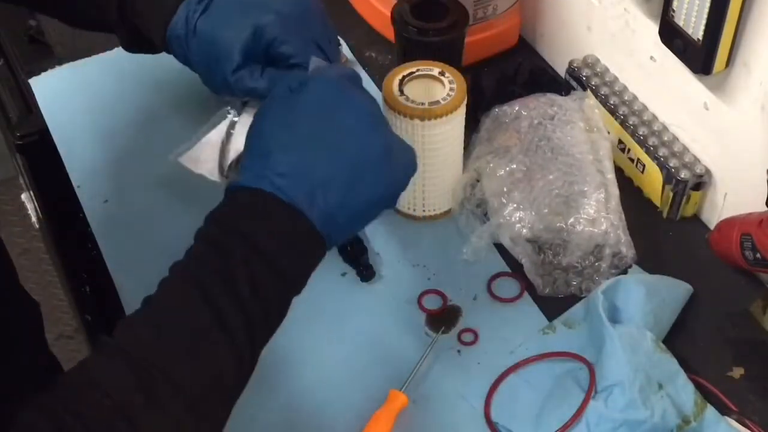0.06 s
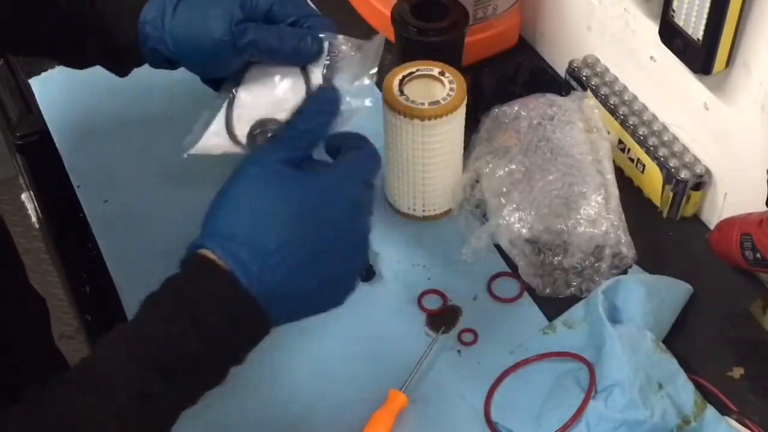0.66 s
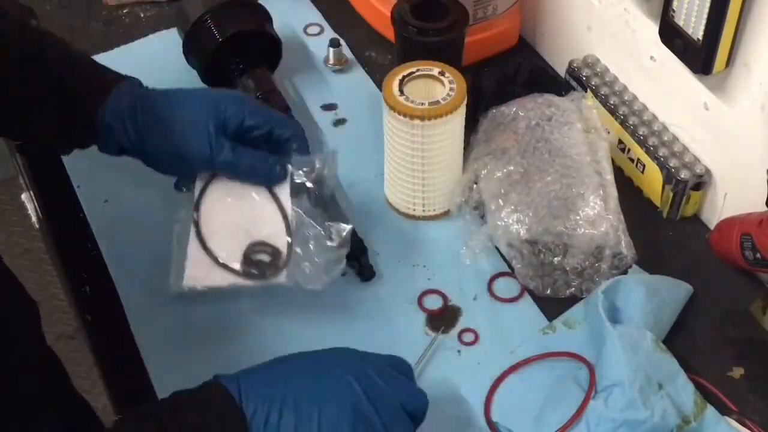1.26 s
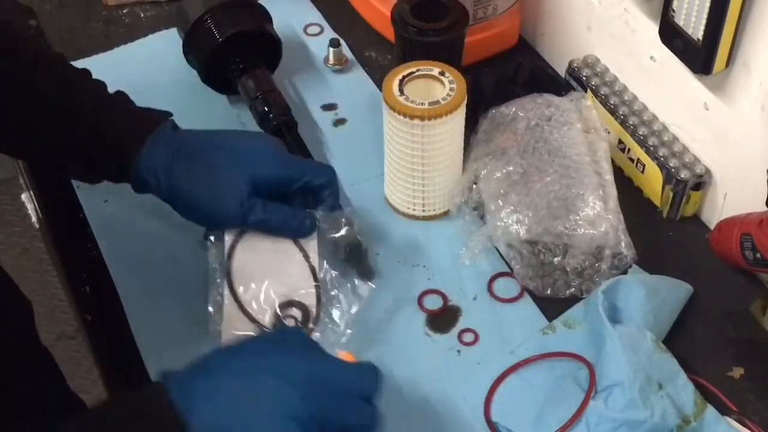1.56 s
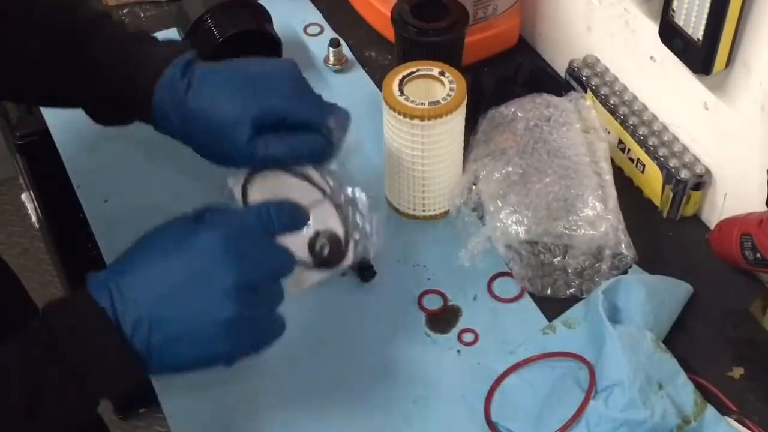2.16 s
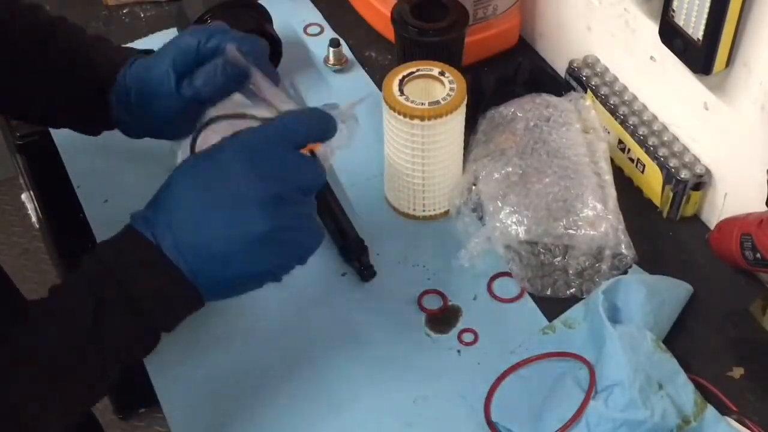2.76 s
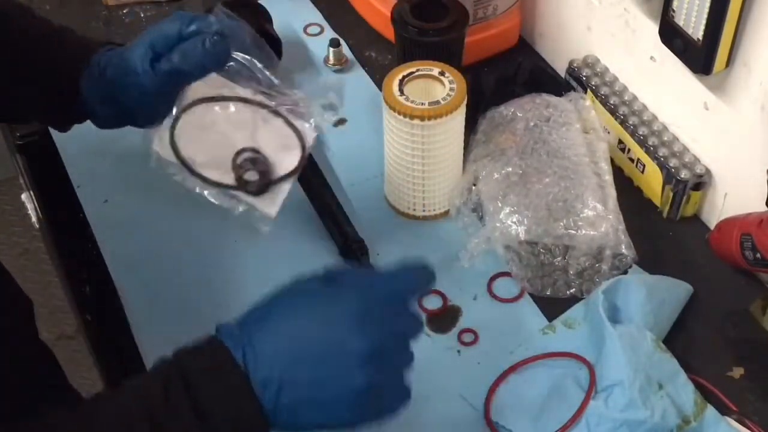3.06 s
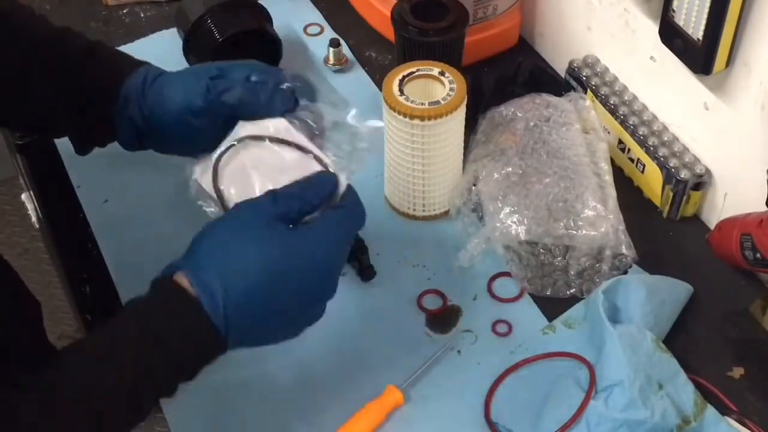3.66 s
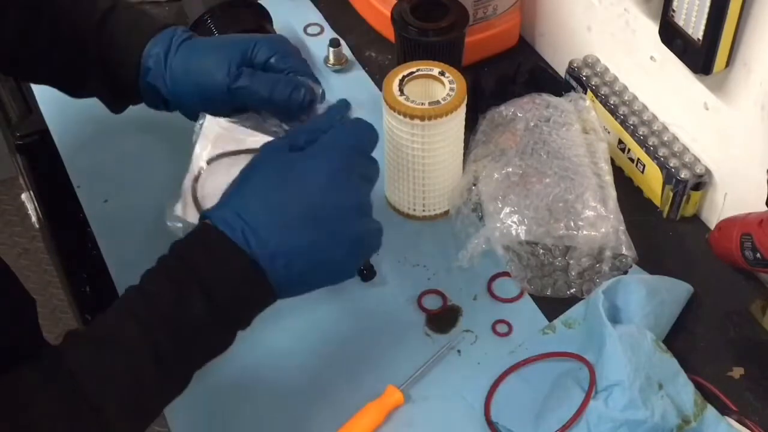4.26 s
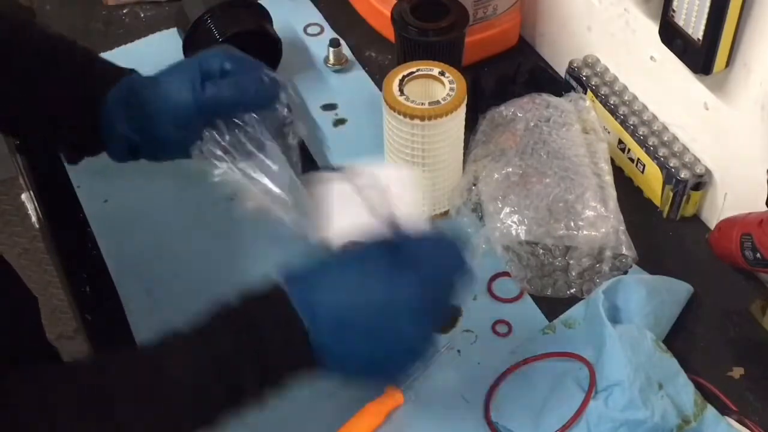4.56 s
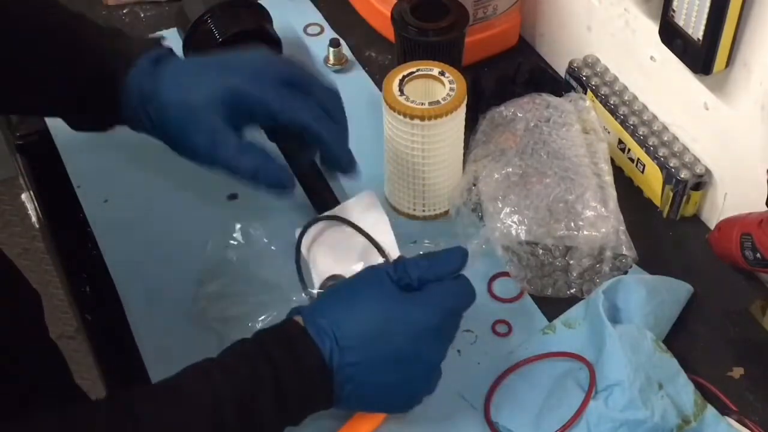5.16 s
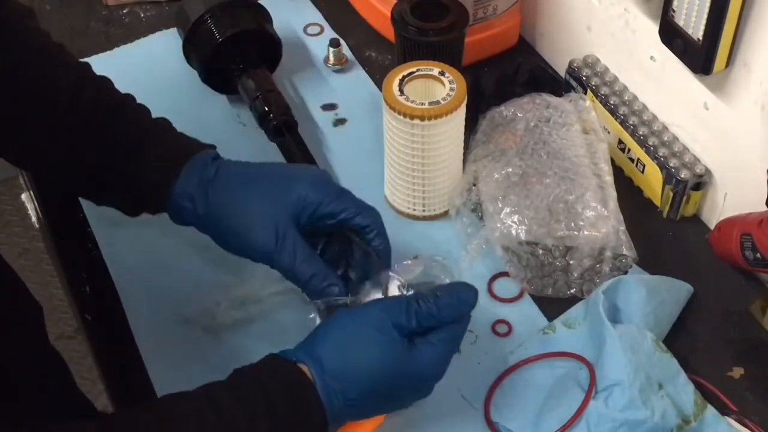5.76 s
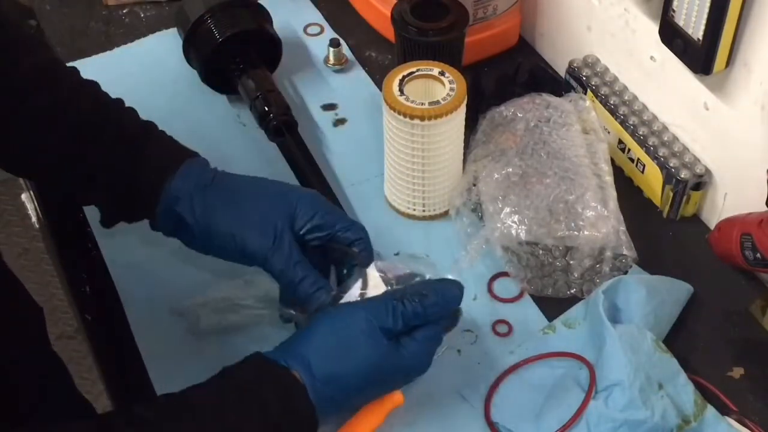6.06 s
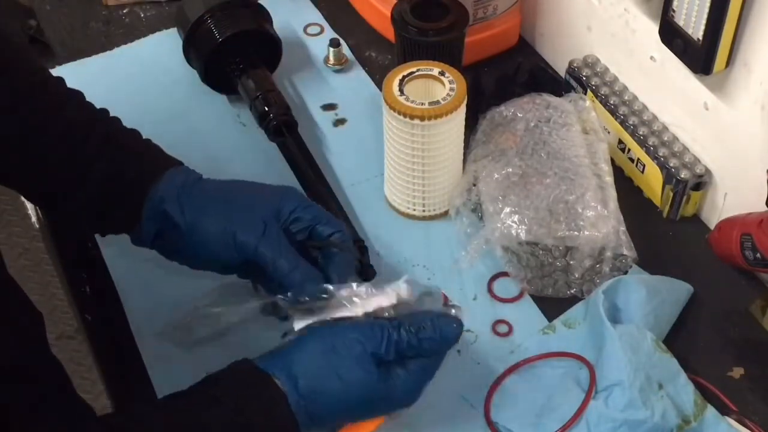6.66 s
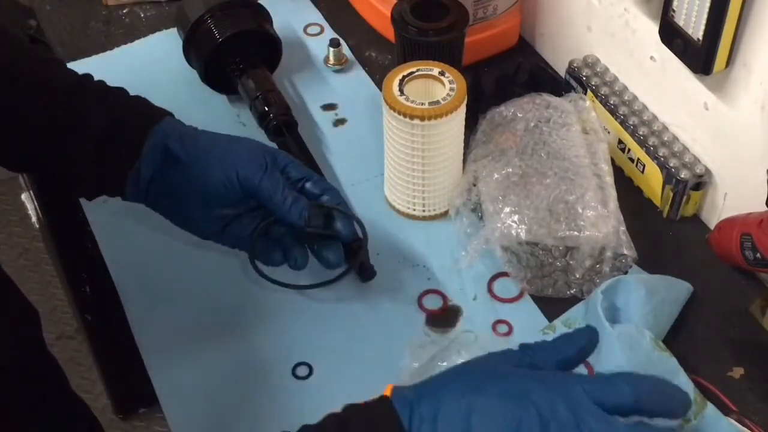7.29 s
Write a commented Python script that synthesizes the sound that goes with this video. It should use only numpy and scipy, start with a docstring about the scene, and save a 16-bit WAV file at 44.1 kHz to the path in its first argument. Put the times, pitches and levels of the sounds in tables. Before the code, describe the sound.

In a small workshop with a faint electrical hum, a thin plastic packet crinkles in short bursts, heard up close. A soft bump on the bench comes first, then louder crackles and a dull knock. More tugging ends in a sharp pop as the plastic gives way. Afterwards, loose plastic and a paper card slide softly over gloves, with a few light snaps that thin out.

```python
"""A workbench in a small workshop, one microphone close to gloved hands opening a plastic packet.
First the fingers flex it: creases snap over a fine crackle, and an arm nudges the bench. The snaps
build, then at 3.3 s something is put down with a dull knock. Near 4.5 s the packet gives way and taut
panels of film pop; the contents slide out until about 7 s. The room answers over a low mains hum."""
import sys
import numpy as np
from scipy import signal
from scipy.fft import rfft, irfft
from scipy.io import wavfile

SR = 44100
rng = np.random.default_rng(int(sys.argv[2]) if len(sys.argv) > 2 else 0)


def output_pcm(signal):
    """Save a mono or channel-first signal as 16-bit PCM at the path in sys.argv[1].

    Samples are clipped to [-1, 1] before scaling.
    """
    pcm = np.clip(np.atleast_2d(signal).T, -1, 1) * 32767
    wavfile.write(sys.argv[1], SR, np.round(pcm).astype(np.int16))


N = 332073


def gain_of(db):
    """Decibels to amplitude."""
    return 10 ** (np.asarray(db) / 20)


def unit_rms(x):
    """Scales to rms 1."""
    return x / np.sqrt(np.mean(x ** 2) + 1e-20)


def curve_at(points, hz):
    """Reads a table on a log-frequency axis."""
    f, value = np.transpose(points)
    return np.interp(np.log(hz + 1), np.log(f + 1), value)


def add(mix, start_s, sound):
    """Mixes a sound in at its start time."""
    part = mix[max(round(start_s * SR), 0):][:len(sound)]
    part += sound[:len(part)]


def band(x, hz, kind, order=2):
    """Causal low-, high- or band-pass."""
    return signal.sosfilt(signal.butter(order, hz, kind, fs=SR, output="sos"), x)


def impulse_response(spectrum, size=2048):
    """A click with the given spectrum and nothing ahead of its attack."""
    log_gain = np.log(gain_of(curve_at(spectrum, abs(np.fft.fftfreq(size, 1 / SR)))))
    return np.fft.ifft(np.exp(np.conj(signal.hilbert(log_gain)))).real[:size // 2]


# The loudest creases, close to the microphone. Each row: start in seconds, midrange level in dB,
# then body and treble in dB against that level.
CREASE_SNAPS = [(0.018, -48.5, -11, 5), (0.062, -42, -13.5, 5), (0.136, -33, -3, -2.5),
                (0.169, -46.5, -15, 3), (0.2043, -39, -1.5, -11), (0.234, -40.5, -3.5, -3.5),
                (0.2495, -42, 3.5, 6), (0.2565, -34, -6, -4), (0.4198, -43.5, 1.5, -11.5),
                (0.497, -44, -10.5, -4), (0.5656, -43.5, -1.5, -0.5), (0.6624, -45.5, -5, 0),
                (0.688, -42, -3.5, 2), (0.797, -42.5, 2, 5), (0.826, -40, -6, -0.5),
                (0.8614, -42.5, -15, 2.5), (0.902, -48, 5, -8), (0.962, -50, -1, 5.5),
                (1.093, -47.5, -10, -13.0), (1.394, -48.5, -5, 0), (1.586, -51.5, 5, -13),
                (1.833, -45, -1, -2), (1.8446, -45.5, 0.5, 3), (1.882, -46.5, -29, -5),
                (1.9391, -46, -6, -1), (2.092, -44.5, 6, -1), (2.2144, -39, -15, -1),
                (2.2458, -36, -23, -5), (2.321, -38.5, -7, 0), (2.4324, -32, -8, -1.5),
                (2.457, -48, -11, 10), (2.482, -34, -17, -5), (2.493, -39, -3, 3), (2.502, -44, -7, 10),
                (2.511, -31.5, -17, -13), (2.53, -25, -6, 1.5), (2.5937, -33.5, -9, 0), (2.69, -48.5, 1, 4),
                (2.7136, -38.5, -20, 0), (2.743, -29, -6.5, 0.5), (2.7605, -34.5, 6, 5),
                (2.779, -21, -6.5, 1.5), (3.062, -38.5, -10.5, -1), (3.2076, -47, -9, 1),
                (3.571, -43, -23, -7), (3.608, -37.5, -9, -4), (3.8752, -36.5, -10, 0),
                (3.9448, -40, -17, 3.5), (3.957, -38, -14, 1), (4.054, -33, -3.5, -3),
                (4.1288, -35.5, -18.5, 3.5), (4.1817, -28, -7.5, 0), (4.2217, -28.5, -7.5, -2),
                (4.274, -40.5, 2.5, -16), (4.3117, -35, -9, -9), (4.339, -36, -18, 2),
                (4.4306, -37.5, -9, 1), (4.4488, -22.5, -3, -2), (4.4815, -30.5, -5, 7),
                (4.487, -29, -6, -7), (4.6299, -45.5, -19, -1), (4.768, -48.5, -5.5, -0.5),
                (5.1755, -45.5, 6.5, -7), (5.224, -47, -0.5, -6.5), (5.4034, -41.5, -5, -4),
                (5.4202, -48, 1, 3), (5.5343, -32.5, -6.5, -1.5), (5.714, -41.5, -10, -4),
                (5.7331, -36, -9, -3), (5.8265, -47, -11, 6.5), (5.8682, -48.5, -4.5, 2),
                (5.916, -53, -14, 7), (5.9906, -49, -24, 4), (6.0306, -53.5, -5.5, 8),
                (6.041, -57.5, -8, 7), (6.084, -57, -14, 8), (6.124, -51, -20, 2), (6.225, -60.5, -15, 9.5),
                (6.432, -59, -16, -8.5), (6.6417, -45.5, -7, -4), (6.8686, -51, -4, -1),
                (6.989, -53, -4, -6), (7.044, -53, -2, -10.5), (7.44, -55.5, -10.5, -4)]
def snaps(film, run_s=.0012, ringing=0.8, push=0.87, body_hz=1400, treble_hz=5000):
    """A crease gives way in a run of jerks; packet, hands and bench scatter them, treble most briefly."""
    out, t = np.zeros(N), np.arange(SR // 25) / SR
    progress = np.minimum(t / run_s, 1)
    giving_way = np.sin(np.pi * progress) + 0.25 * np.exp(-t / 0.0068) * progress
    colours = [band(band(film, 360, "high"), body_hz, "low", order=3),
               band(film, [body_hz, treble_hz], "band"),
               band(film, treble_hz, "high", order=3)]
    for start, db, body_db, treble_db in CREASE_SNAPS:
        jerks = rng.standard_normal(len(t)) * giving_way
        jerks[(rng.uniform(0, run_s, 2) * SR).astype(int)] += 1.5 * rng.choice([-1, 1], 2)
        # the jerks sound directly and through the facet beside the crease
        crack = unit_rms(jerks) + ringing * unit_rms(facet(jerks, cycles=0.9, scatter=1.9)[:len(t)])
        # the sheet around it shifts in one short push, which gives a body without pitch
        shove = crack + push * np.linalg.norm(crack) * signal.unit_impulse(len(t), int(run_s * SR / 2))
        drives = [shove, crack, crack * np.exp(-t / 0.019)]
        for colour, part_db, drive in zip(colours, [body_db, 0, treble_db], drives):
            part = signal.fftconvolve(drive, colour)
            part *= np.sqrt(SR / 200) / np.linalg.norm(part)  # the energy of 5 ms at rms 1
            add(out, start, gain_of(db + part_db) * part)
    return out


# Whole panels of film flipping over, partly shielded from the walls by the hands. Each row: start in
# seconds, level in dB, pitch in Hz, t60 in seconds, share sent to the walls in dB.
PANEL_POPS = [(4.449, -6.5, 902, 0.012, -4.5), (4.472, -22.5, 483, 0.022, -9),
              (5.176, -38, 975, 0.0042, -5), (5.536, -29, 1230, 0.011, -3),
              (5.733, -27.5, 970, 0.022, -0.5), (5.736, -24.5, 1340, 0.0074, -1.5)]
# The modes of such a panel. Each row: multiple of the pitch, relative level in dB.
PANEL_MODES = [(0.521, -14.5), (1.001, 6.5), (1.42, -2), (1.9, 3), (2.35, 2), (3.801, -5)]
def pops(to_walls=False, rise_s=0.0006):
    """A taut panel flips and rings briefly, upper modes dying first; little radiates below its pitch."""
    out, t = np.zeros(N), np.arange(SR // 20) / SR
    for start, db, hz, t60, walls_db in PANEL_POPS:
        ring = sum(gain_of(mode_db - 60 * t * np.sqrt(ratio) / t60) * np.sin(2 * np.pi * ratio * hz * t)
                   for ratio, mode_db in PANEL_MODES)
        pop = band(ring * (1 - np.exp(-t / rise_s)), 0.41 * hz, "high", order=3)
        add(out, start, gain_of(db + to_walls * walls_db) * pop)
    return out


def facet(drive, cycles=1.6, scatter=2.85, scatter_s=0.0018, longest_s=0.00066, rise_s=0.00033, count=9):
    """One small facet of film buckles: a few modes, and bending waves scattered by the creases."""
    t = np.arange(700) / SR
    hz = np.geomspace(600, 14000, count)[:, None] * rng.uniform(0.9, 0.91, (count, 1))
    life_s = 1 / (hz / cycles + 1 / longest_s)
    modes = rng.standard_normal((count, 1)) * np.sin(2 * np.pi * hz * t) * np.exp(-t / life_s)
    ring = unit_rms((modes * np.sqrt(hz / life_s)).sum(0))
    ring += scatter * unit_rms(rng.standard_normal(len(t)) * np.exp(-t / scatter_s))
    sound = signal.fftconvolve(ring * (1 - np.exp(-t / rise_s)), drive)
    return sound / np.linalg.norm(sound)


# Film and paper sliding over gloves, heard close up. Each row: frequency in Hz, relative level in dB.
RUB_SPECTRUM = [(200, -7), (700, -14.5), (1100, 5), (1900, -9.5), (2900, -3.5), (6500, -7.5), (9000, -5),
                (16000, -10)]
def crackle(film, work, per_s, spread_db, rub, low_db, high_db, steady_s=0.057, count=16):
    """Countless tiny facets of uneven size flick over, above the hiss of film sliding on glove."""
    level, treble = work
    # harder flexing flips more facets a second, until they merge into a rip
    flipped = np.cumsum(level ** .55)
    grains = np.zeros(N)
    for _ in range(count):
        hits = np.searchsorted(flipped, flipped[-1] * rng.random(int(per_s * N / SR / count)))
        train = np.zeros(N)
        train[hits] = gain_of(spread_db * np.minimum(rng.exponential(1, len(hits)), 4))
        grains += signal.oaconvolve(train, facet(film))[:N]
    hiss = signal.oaconvolve(rng.standard_normal(N), impulse_response(RUB_SPECTRUM))[:N]
    texture = unit_rms(grains) + rub * unit_rms(hiss)
    # evened out, so that the work of the fingers sets how much energy is released
    texture /= np.sqrt(signal.oaconvolve(texture ** 2, np.hanning(int(2 * steady_s * SR)), "same"))
    low = unit_rms(band(texture, 3500, "low", order=3))
    high = unit_rms(band(texture, 4300, "high", order=3))
    return gain_of(low_db) * level * low + gain_of(high_db) * treble * high


def folds(level, db, per_s, low_hz, high_hz, cycles=2.2, spread_db=4.0, count=14):
    """Broad, soft folds give way with dull little pips of assorted pitch, each a few cycles long."""
    out, t = np.zeros(N), np.arange(SR // 60) / SR
    for hz in np.geomspace(low_hz, high_hz, count):
        pip = unit_rms(np.sin(2 * np.pi * hz * t) * np.exp(-hz * t / cycles))
        for place, size in rng.random((int(per_s * N / SR / count), 2)):
            add(out, place * N / SR, pip * gain_of(spread_db * min(-np.log(1 - size), 3)))
    return gain_of(db) * level * unit_rms(out)


def ticks(treble, per_s=24, size_db=3, spread_db=8.0, count=8):
    """The smallest creases tick at random, thin and bright, louder under harder fingers."""
    out = np.zeros(N)
    for _ in range(count):
        hits = rng.random(N) < per_s / count / SR
        sizes = gain_of(size_db + spread_db * np.minimum(rng.exponential(1, N), 3))
        out += signal.oaconvolve(hits * sizes * treble ** 0.86, facet(np.ones(1), scatter_s=0.0014))[:N]
    return band(out, 4500, "high", order=1)


def effort(moves, attack_s, ease_db_per_s, release_db_per_s, held_db=-71, laid_down_s=7.2):
    """Amplitude of the film's lower and upper range as each move takes hold, eases off and lets go."""
    t, power = np.arange(N) / SR, np.zeros((2, N))
    for start, length, db, treble_db in moves:
        age = t[:round((length + .25) * SR)]
        fall_db = ease_db_per_s * age + release_db_per_s * np.maximum(age - length, 0)
        level = np.minimum(age / attack_s, 1) * gain_of(db - fall_db)
        add(power[0], start, level ** 2)
        add(power[1], start, (level * gain_of(treble_db)) ** 2)
    # the film whispers as long as it is held, and settles once it is laid down
    whisper = gain_of(held_db - 35 * np.maximum(t - laid_down_s, 0))
    return np.sqrt(power + whisper ** 2)


# Fingers flex and tug the closed packet above the bench. Each row: start in seconds, length in seconds,
# level in dB, treble in dB against that level.
FINGER_FLEXES = [(0, .1, -54, 3.5), (0.138, .07, -55, -1), (.225, .035, -44, -9), (.275, .05, -49, -1.5),
                 (.35, .06, -46, 0), (.415, .05, -50, -5.5), (.543, .035, -54, 0.5), (.675, .025, -54, -9),
                 (.768, .04, -42, -1), (.82, .135, -48, -2.5), (2.013, .015, -53, -3),
                 (2.123, .05, -52, -2), (2.215, .09, -54, 2), (2.318, .055, -47, 0), (2.418, .068, -48, -6),
                 (2.497, .045, -37.5, 0.5), (2.561, .04, -48, 5), (2.708, .03, -43, 3.5),
                 (2.728, .06, -36, -3), (3.266, .035, -58, -0.5), (3.432, .08, -61, 2.5),
                 (3.566, .08, -45, 3.5), (3.833, .08, -52, 6), (3.952, .15, -51, 1),
                 (4.105, .135, -44.5, 0.5), (4.28, .085, -48, 1.5), (4.456, .075, -35.5, 4),
                 (4.477, .025, -30, -4), (4.529, .16, -51, -3)]
# The loose or opened packet and its paper card slide over the gloves. Each row reads as for the flexes.
GLOVE_STROKES = [(1.305, .06, -57.5, 1), (1.5, .07, -59, 1), (4.805, .12, -57, 2.5), (5.18, .14, -63, -2),
                 (5.395, .03, -55, -1), (5.485, .1, -51, -0.5), (5.642, .16, -58, 0), (5.89, .06, -59, 2),
                 (6.025, .135, -57, -0.5), (6.19, .035, -60.5, -2), (6.3, .028, -54, 0),
                 (6.357, 0.12, -62, -9), (6.48, .028, -55.5, -1), (6.56, .12, -61.5, 0.5),
                 (6.72, .04, -57, -2.5), (6.852, .04, -63, -9), (6.95, .05, -63, 2.5),
                 (7.025, .095, -57.5, 2.5), (7.131, .07, -63.5, 0)]
def rustle(film):
    """Taut film crackles under the fingers; slack film mostly slides, catching on the card's edges."""
    flexing = effort(FINGER_FLEXES, attack_s=.012, ease_db_per_s=18, release_db_per_s=450)
    stroking = effort(GLOVE_STROKES, attack_s=.02, ease_db_per_s=20, release_db_per_s=290)
    taut = crackle(film, flexing, per_s=1200, spread_db=7, rub=0.14, low_db=-3.5, high_db=-3.0)
    taut += folds(flexing[0], db=-6.0, per_s=220, low_hz=520, high_hz=2460)
    slack = crackle(film, stroking, per_s=600, spread_db=6.5, rub=1.17, low_db=-4.5, high_db=-2.5)
    slack += folds(stroking[0], db=-4.5, per_s=120, low_hz=1350, high_hz=2420, cycles=5)
    return taut + slack + ticks(flexing[1] + 0.47 * stroking[1])  # slack film ticks less


# Knocks and nudges on the bench, just below the hands. Each row: start in seconds, relative level in dB,
# cut-off of the blow in Hz (lower is softer).
BENCH_KNOCKS = [(1.14, -37.5, 219), (1.335, -40.5, 188), (1.711, -28, 190), (3.185, -34.5, 212),
                (3.324, -20, 855), (3.329, -20, 820), (3.3367, -23, 1310), (3.379, -23, 524)]
# The modes of the bench. Each row: frequency in Hz, relative level in dB, t60 in seconds.
BENCH_MODES = [(94.7, -13.5, 0.58), (150, -12, 0.14), (170, -6, 0.12), (203.5, -5.5, 0.19), (321, -8, 0.14),
               (420, -0.5, 0.058), (950, -21, 0.06), (1200, -16, 0.06)]
def knocks(clatter=0.9, clatter_t60=0.096, clatter_hz=1600, boom=0.22, boom_t60=0.2, boom_hz=260):
    """Soft blows ring the bench, each from another spot; what lies on it clatters and the frame booms."""
    out, t = np.zeros(N), np.arange(SR // 2) / SR
    for start, db, cutoff_hz in BENCH_KNOCKS:
        ring = sum(gain_of(mode_db - 60 * t / t60) * np.sin(2 * np.pi * (hz * t + rng.random()))
                   for hz, mode_db, t60 in BENCH_MODES)
        for size, t60, top_hz in (clatter, clatter_t60, clatter_hz), (boom, boom_t60, boom_hz):
            noise = unit_rms(band(rng.standard_normal(len(t)), [110, top_hz], "band"))
            ring += size * noise * gain_of(-60 * t / t60)
        add(out, start, gain_of(db) * band(ring, cutoff_hz, "low") / 2)
    return band(out, 67, "high")


# An arm shifts on the bench, near the microphone. Each row: time in seconds, level in dB.
ARM_LEVELS = [(1.05, -72), (1.301, -54), (1.66, -61.5), (1.745, -43), (1.95, -74)]
def arm_rumble(band_hz=(72, 112)):
    """The bench top rumbles softly under a moving arm."""
    level_db = np.interp(np.arange(N) / SR, *np.transpose(ARM_LEVELS))
    return gain_of(level_db) * unit_rms(band(rng.standard_normal(N), band_hz, "band", order=3))


# The workshop's reverberation, heard from the bench. Each row: frequency in Hz, t60 in seconds.
WALL_DECAY = [(200, 0.65), (530, 0.64), (1600, 0.75), (6000, 0.5), (10000, 0.34), (16000, 1.1)]
# The colour of that reverberation. Each row: frequency in Hz, relative level in dB.
WALL_SPECTRUM = [(100, 8), (400, -1), (1500, 1), (9000, -5), (16000, -14.5)]
def room(x, wet_db=-13, delay_s=.003, crossfade_s=.03, count=4):
    """The walls return a diffuse tail, whose pattern changes as the packet moves about."""
    out = np.zeros(N)
    for k in range(count):
        hz, t, spectra = signal.stft(rng.standard_normal(SR // 2), SR, nperseg=256)
        tail_db = curve_at(WALL_SPECTRUM, hz)[:, None] - 60 * t / curve_at(WALL_DECAY, hz)[:, None]
        tail = signal.istft(spectra * gain_of(tail_db), SR, nperseg=256)[1]
        tail = np.append(np.zeros(round(delay_s * SR)), tail)
        # the sound is handed from one tail to the next
        turn = (np.arange(N) / SR / crossfade_s + k) % count
        share = np.sin(np.pi / 2 * np.minimum(turn, 2))
        out += signal.oaconvolve(x * share, tail / np.linalg.norm(tail))[:N]
    return gain_of(wet_db) * out


# The workshop's air, all around the microphone. Each row: frequency in Hz, relative level in dB.
AIR_SPECTRUM = [(15, -37.5), (30, -24.5), (43, 1), (60, -9.5), (125, -16), (300, -26), (500, -27),
                (900, -35.5), (2000, -42), (9000, -50), (16000, -58)]
# Mains hum in the room. Each row: frequency in Hz, rms level in dB.
MAINS_HUM = [(59.6, -59.5)]
def room_tone(air_db=-54):
    """Low rumble and thin hiss of the workshop, with mains hum."""
    t = np.arange(N) / SR
    colour = gain_of(curve_at(AIR_SPECTRUM, np.fft.rfftfreq(N, 1 / SR)))
    air = irfft(rfft(rng.standard_normal(N)) * colour, N)
    hum = sum(gain_of(db) * np.sqrt(2) * np.sin(2 * np.pi * (hz * t + rng.random()))
              for hz, db in MAINS_HUM)
    return gain_of(air_db) * unit_rms(air) + hum


# The colour of the crackling film at close range. Each row: frequency in Hz, relative level in dB.
FILM_SPECTRUM = [(100, -32), (200, -8.5), (340, 0.5), (520, -3.5), (700, -11), (950, 2), (1270, -2.5),
                 (1950, 2), (2800, -6), (3800, -0.5), (5000, -3.5), (8500, -6), (13000, -13.5),
                 (16000, -22)]
def scene():
    """Packet and bench close to the microphone, the workshop behind them, in mono."""
    film = impulse_response(FILM_SPECTRUM)
    handling = rustle(film) + knocks() + arm_rumble()
    # a snap leaves the crumpled film differently in each direction, so the walls get a longer blend of it
    walls = room(handling + pops(to_walls=True) + snaps(film, run_s=.018, ringing=0.089, push=0.36))
    return (handling + pops() + snaps(film) + walls + room_tone())[None]


def record(dry, edge_hz=16100):
    """The recorder's band limit."""
    low_pass = signal.firwin(401, edge_hz, window=("kaiser", 9), fs=SR)
    return signal.oaconvolve(dry, low_pass[None], "same")


dry = scene()
out = record(dry)
output_pcm(out)
```